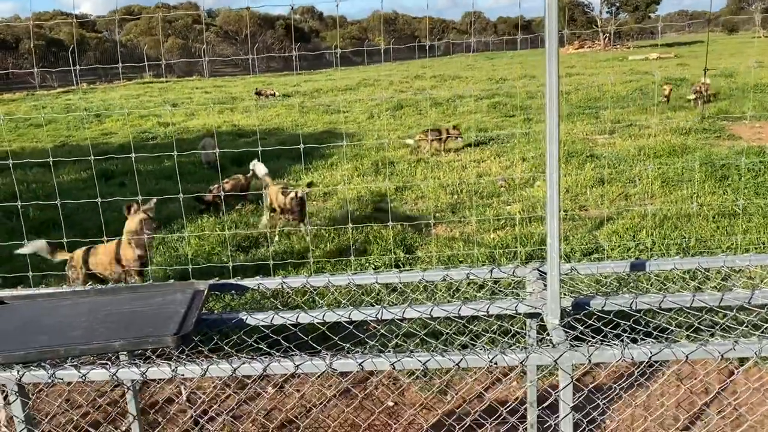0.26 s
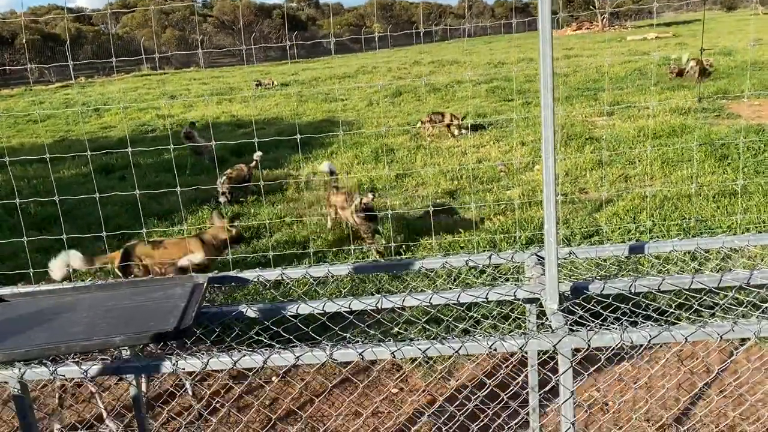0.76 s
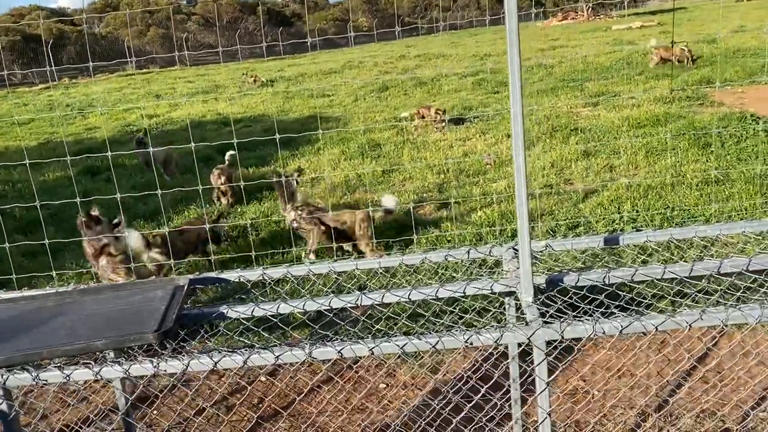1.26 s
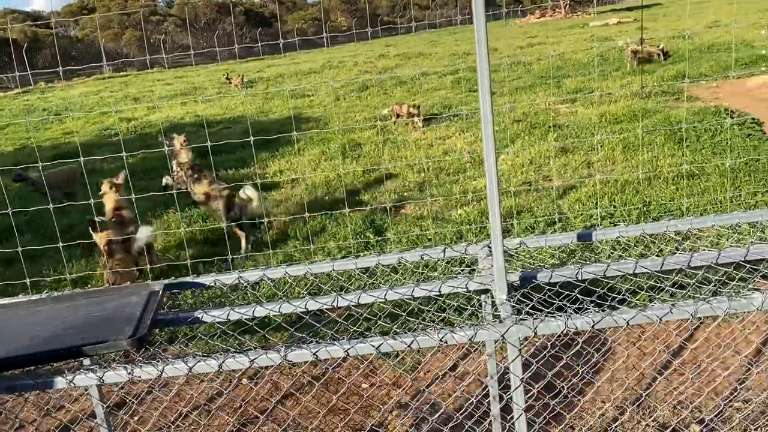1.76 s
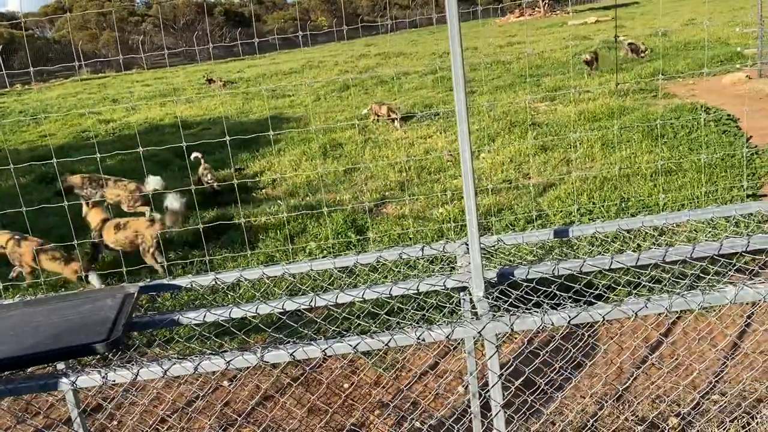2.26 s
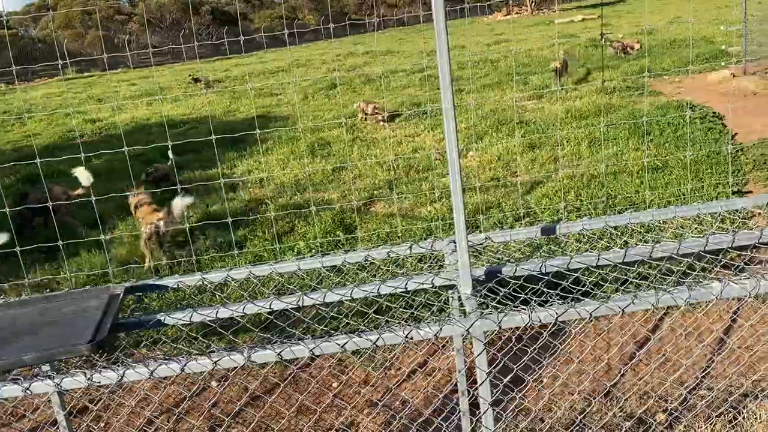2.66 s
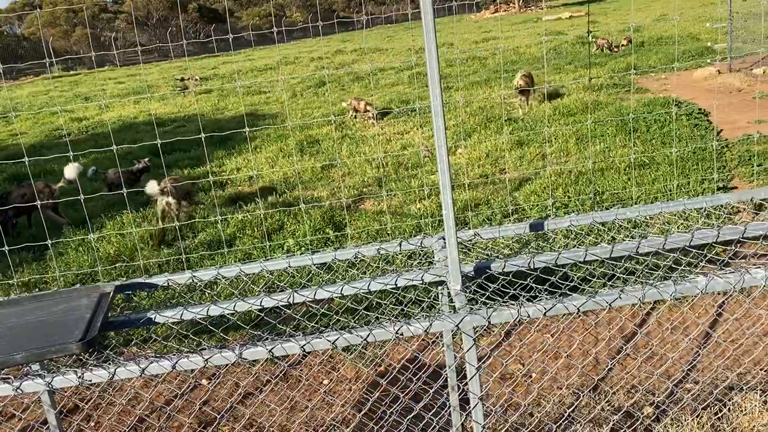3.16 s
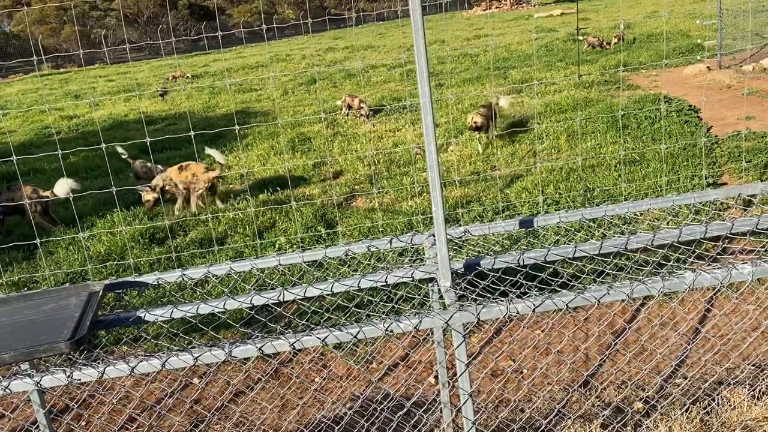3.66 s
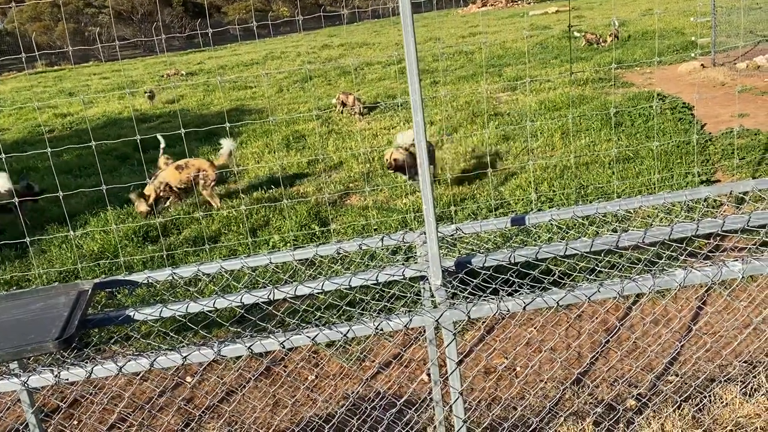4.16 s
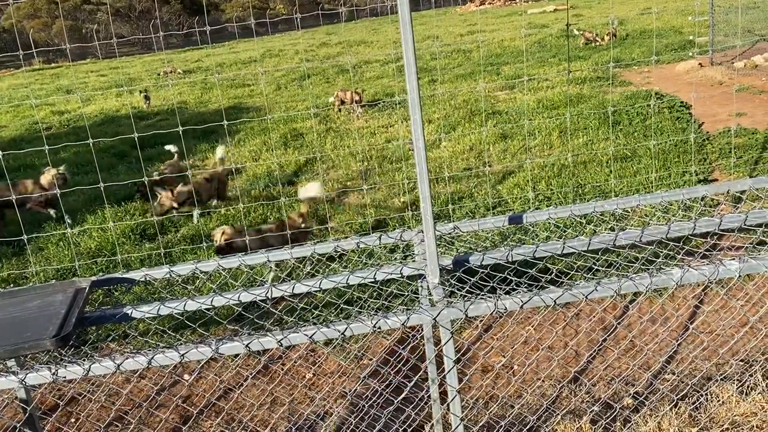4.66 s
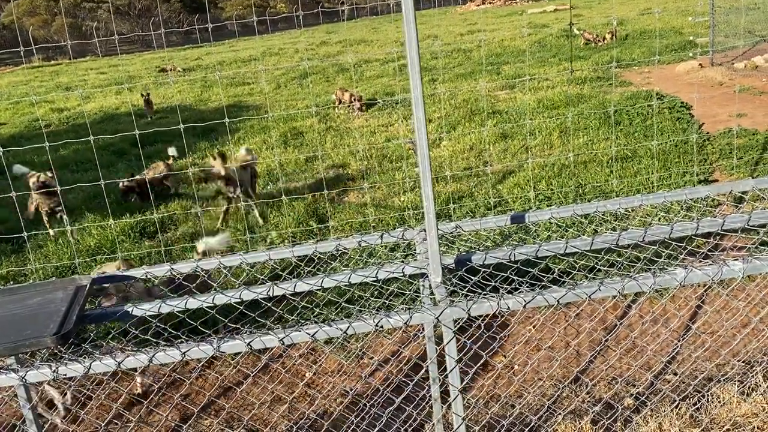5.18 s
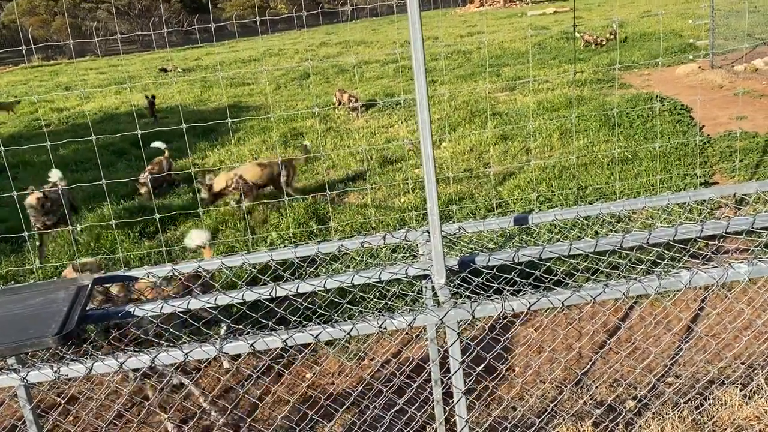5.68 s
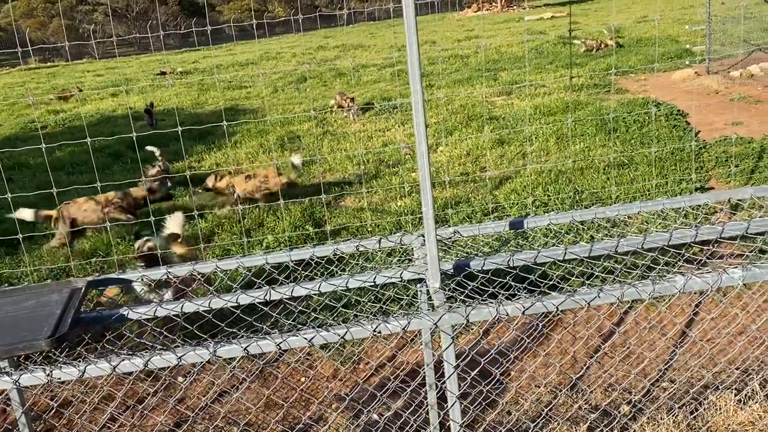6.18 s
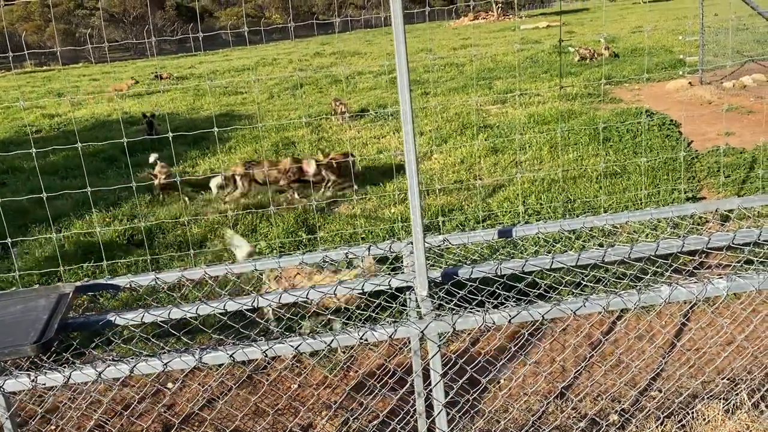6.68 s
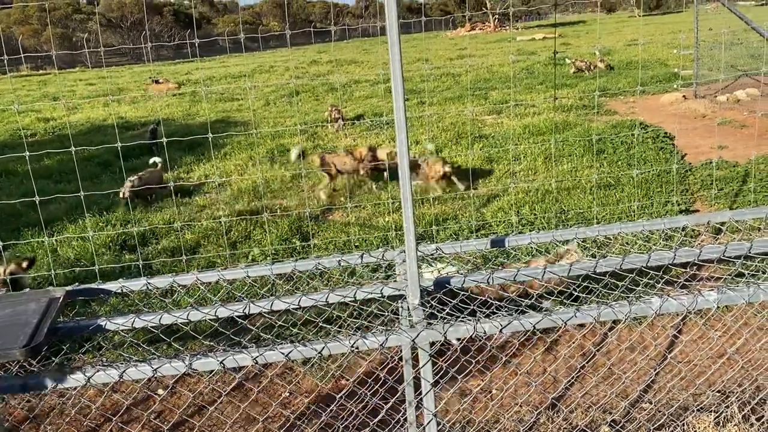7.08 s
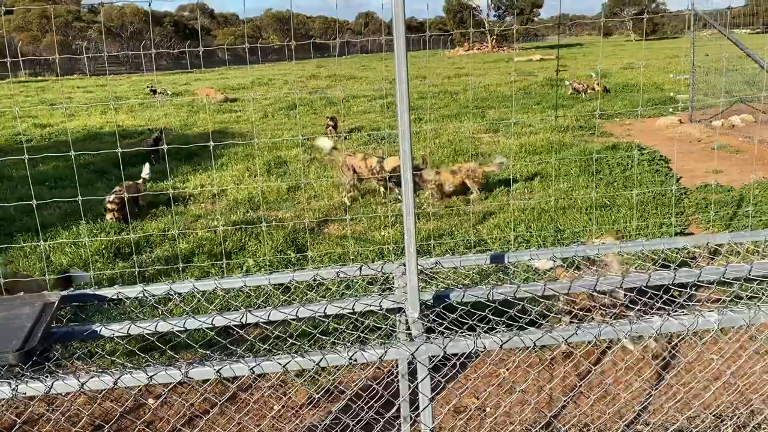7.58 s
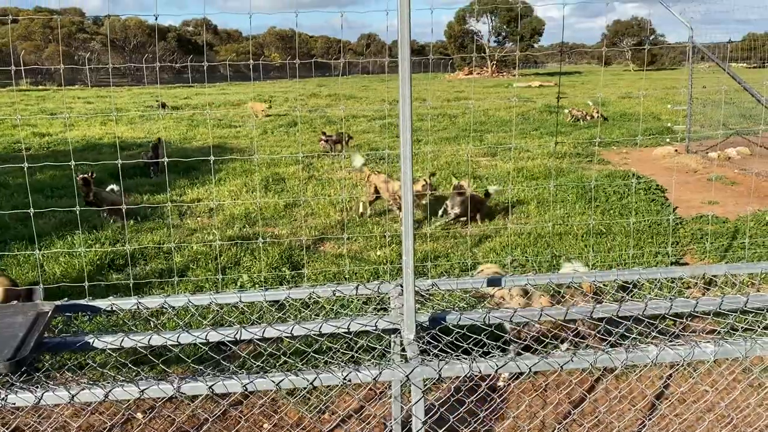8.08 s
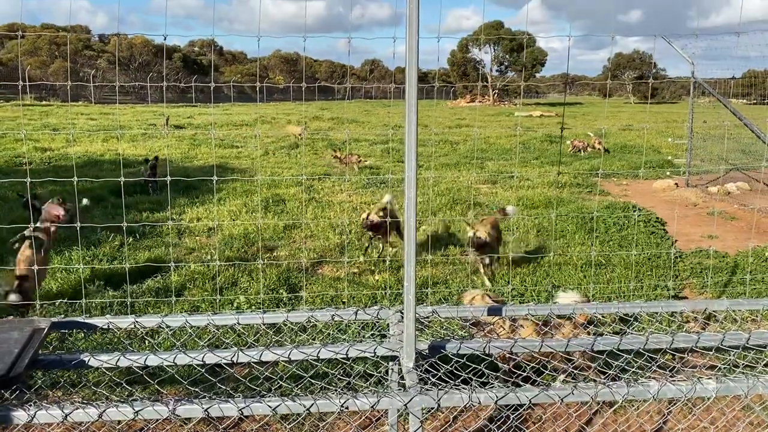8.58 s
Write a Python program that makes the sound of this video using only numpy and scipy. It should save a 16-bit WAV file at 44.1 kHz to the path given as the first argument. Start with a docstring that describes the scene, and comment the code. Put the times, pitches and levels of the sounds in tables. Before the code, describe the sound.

Wild dogs sound almost like birds: tiny harmonic chirps that rise, arch or drop, laced with airy piercing whistles. They come in bunches with gaps between, joined by a bright squeal, a sharp yelp, low grunts, faint rasps and a wavering whine. The open field adds slight scatter and a bright fence reflection. A stereo phone microphone catches low wind buffets, a few dull knocks and faint far-off rumble.

```python
"""Wild dog pack at the fence

African wild dogs twitter as they run about a grassy enclosure, heard from a phone at the fence.
Most calls are short gliding chirps of harmonics; thin pure whistles swoop among them in puffs of air.
A few calls stretch into whines, squeals and a yelp; grunts, toneless rasps and faint far answers join in.
Filtered noise makes the scatter off grass and fence, the fence knocks, the distant wash and the wind;
single eddies thump the microphone as slowing low tones."""
import sys
import numpy as np
from scipy import signal
from scipy.fft import rfft, irfft, next_fast_len
from scipy.io import wavfile
from scipy.ndimage import uniform_filter1d, map_coordinates

SR = 44100
rng = np.random.default_rng(int(sys.argv[2]) if len(sys.argv) > 2 else 0)


def unload_audio(sound):
    """Save the sound as a 16-bit wav file, at the path given as the first command line argument."""
    columns = np.transpose(np.atleast_2d(sound))
    # keep every value between -1 and 1, then stretch to whole-number steps
    steps = np.round(np.clip(columns, -1, 1) * 32767)
    wavfile.write(sys.argv[1], SR, steps.astype(np.int16))


N = 389844
TIME = np.arange(N) / SR

# Call levels are at the source, before its fades and the path to the phone.
# Harmonic levels are relative to the fundamental; upper_db is the 4th harmonic.
# Chirps of the pack: start_s, length_s, middle_pitch_hz, gesture, level_db, second_db, upper_db
CHIRP_CALLS = [(0, 0.021, 800, "sag", -30, -10, -22), (0.025, 0.062, 2000, "arch", -47.5, -17, -37),
               (0.101, 0.023, 2110, "level", -45, -17, -33), (0.135, 0.046, 1400, "hook", -47, -2.5, -24),
               (0.322, 0.028, 1810, "drop", -46.5, -23, -45), (0.4, 0.015, 1964, "drop", -54.5, -18, -30),
               (0.444, 0.04, 950, "climb", -49, -10, -16), (0.453, 0.06, 1880, "bow", -49.5, -8, -34),
               (0.544, 0.06, 1507, "bow", -52.5, 8, -33), (0.686, 0.015, 1675, "drop", -51, -7.5, -38),
               (1.293, 0.02, 1696, "level", -19, -22.5, -28),
               (1.314, 0.027, 1084, "drop", -30.5, -3.5, -15), (1.404, 0.04, 1155, "arch", -29.5, -5, -20),
               (1.448, 0.029, 725, "sag", -37.5, -11, -19), (1.499, 0.043, 1217, "rise", -41, -12, -19),
               (1.544, 0.04, 750, "sag", -48.5, -6, -15), (1.587, 0.043, 1640, "bow", -40.5, -1, -25),
               (1.747, 0.043, 1844, "arch", -27, -5.5, -19), (1.78, 0.02, 1336, "sag", -32.5, -24, -20),
               (1.829, 0.037, 1674, "rise", -44, -7, -8), (1.867, 0.051, 1352, "drop", -37.5, -10, -20.5),
               (1.955, 0.024, 1680, "hook", -49, 3, -15), (1.979, 0.028, 1550, "drop", -32, -8.5, -15.5),
               (2.029, 0.089, 1002, "arch", -50.5, -6, -4.5),
               (2.126, 0.04, 1848, "hook", -25, -12.5, -21.5), (2.151, 0.036, 898, "drop", -43, -15, -23),
               (2.32, 0.049, 1520, "drop", -37, -11, -22.5),
               (2.461, 0.064, 1720, "arch", -41.5, -0.5, -15.5),
               (2.831, 0.035, 997, "sag", -39.5, -13.5, -48), (3.157, 0.028, 1493, "drop", -37.5, 2.5, -20),
               (3.177, 0.036, 1870, "rise", -34.5, -12, -5.5),
               (3.201, 0.018, 1595, "sag", -27.5, -11, -25.5), (3.267, 0.034, 2020, "level", -36, -2, -10),
               (3.292, 0.021, 1397, "sag", -40.5, -13.5, -21), (3.344, 0.04, 2160, "rise", -37, 6.5, -8),
               (3.372, 0.02, 1622, "drop", -39.5, -19.5, -16), (3.397, 0.027, 1764, "hook", -45.5, 12, -6),
               (3.423, 0.018, 886, "sag", -39, -14, -20), (3.622, 0.04, 1560, "drop", -49.5, 9.5, -0.5),
               (3.666, 0.0084, 1010, "rise", -37.5, 12, -3.5), (3.952, 0.032, 1734, "sag", -44, -8.5, -18),
               (4, 0.029, 952, "sag", -40.5, -21, -19.5), (4.339, 0.036, 1924, "arch", -45, -0.5, -0.5),
               (4.372, 0.02, 1240, "drop", -45, -20, -24), (4.453, 0.0087, 1197, "climb", -36.5, -21, -29),
               (4.456, 0.032, 1567, "rise", -37, 2.5, -17.5), (4.667, 0.035, 1804, "hook", -36.5, -8, -10),
               (5.411, 0.015, 1363, "rise", -50.5, -11, -20), (5.74, 0.068, 2110, "climb", -50, -11, -9),
               (5.843, 0.044, 2000, "climb", -48, -13, -1), (5.945, 0.034, 1967, "climb", -48.5, -24, -7.5),
               (6.025, 0.032, 1747, "level", -28, -14, -13), (6.055, 0.011, 1437, "sag", -46, -6, -23),
               (6.118, 0.042, 2122, "bow", -29.5, -14, -7.5), (6.151, 0.017, 1508, "sag", -40, -13, -18),
               (6.208, 0.029, 1004, "sag", -54, -5, -23), (6.311, 0.022, 2212, "level", -34.5, -1, -11.5),
               (6.326, 0.028, 1504, "drop", -37.5, -20, -14.5), (6.491, 0.04, 1850, "slide", -39, -5, -10),
               (7.09, 0.03, 1037, "sag", -35.5, -4.5, -17.5), (7.206, 0.04, 925, "drop", -46.5, -11, -27),
               (7.578, 0.048, 1314, "rise", -27, -3.5, -15.5),
               (7.805, 0.052, 1325, "dive", -26.5, -12.5, -25), (7.871, 0.021, 1271, "sag", -29, -4.5, -20),
               (7.945, 0.031, 742, "sag", -36.5, -16, -13.5), (7.981, 0.025, 1057, "sag", -37.5, -9, -28),
               (8.167, 0.028, 1837, "hook", -34.5, -9, -18), (8.182, 0.034, 1080, "drop", -28, -10, -19.5),
               (8.279, 0.027, 869, "drop", -36, -3.5, -8), (8.657, 0.033, 1720, "drop", -29, -10, -24)]
# Pitch gestures of a chirp: start and end pitch, as ratios to the middle pitch ("rise" peaks midway and ends
# below its start)
CHIRP_GESTURES = {"arch": (.76, .68), "hook": (.93, .57), "drop": (1.3, 0.548), "rise": (.83, 0.77),
                  "sag": (1.1, 0.876), "dive": (.92, 0.361), "bow": (.81, .76), "slide": (1.03, 0.29),
                  "level": (.91, .92), "climb": (.86, 1.03)}
CHIRP_WAVER, CHIRP_FLUTTER_DB = 0.012, 3.5  # unsteadiness of pitch (share) and of level
CHIRP_CREST, CHIRP_WIDTH = 0.47, 0.49  # loudest point and width of the swell, as shares of the length
CHIRP_DB, WHISTLE_DB = -0.6, -1  # mix gain of the chirps and of the whistles with the trill
OVERTONE_FALL_DB = -4  # extra loss per harmonic above the fourth

# Whistles: middle_s, length_s, middle_pitch_hz, gesture, level_db (at the middle)
WHISTLE_CALLS = [(1.283, 0.011, 6780, "up", -25.5), (1.409, 0.016, 6550, "up", -20.5),
                 (1.52, 0.037, 9500, "sway", -36), (1.565, 0.0099, 11500, "hold", -28.5),
                 (1.634, 0.017, 6550, "down", -26), (1.647, 0.024, 5270, "dip", -28),
                 (1.735, 0.007, 6350, "hold", -21.5), (1.797, 0.011, 7650, "down", -30.5),
                 (1.816, 0.064, 5070, "sway", -35), (1.853, 0.026, 5900, "up", -38),
                 (1.903, 0.021, 9800, "up", -39), (1.947, 0.036, 6400, "dip", -37.5),
                 (1.993, 0.049, 6740, "sway", -31.5), (2.018, 0.023, 6600, "dip", -33),
                 (2.065, 0.084, 10660, "crest", -38), (2.12, 0.026, 8330, "up", -28),
                 (2.183, 0.022, 5000, "hold", -25.5), (2.315, 0.022, 7970, "up", -33.5),
                 (2.514, 0.011, 9040, "down", -32.5), (2.529, 0.033, 5130, "dip", -29.5),
                 (2.835, 0.064, 6180, "hold", -42.5), (3.151, 0.0131, 7430, "up", -31.5),
                 (3.209, 0.016, 10900, "up", -36), (3.301, 0.0126, 12000, "down", -43),
                 (3.308, 0.02, 7200, "down", -37), (3.381, 0.0067, 6870, "dip", -26),
                 (3.402, 0.0075, 9200, "up", -29), (3.439, 0.019, 4730, "dip", -33),
                 (3.455, 0.035, 6950, "up", -37), (3.62, 0.033, 7040, "up", -29.5),
                 (3.626, 0.013, 12600, "up", -43), (3.672, 0.0096, 11900, "down", -30),
                 (3.992, 0.0073, 8000, "down", -30.5), (4, 0.027, 4750, "dip", -34.5),
                 (4.02, 0.064, 7020, "hold", -44), (4.334, 0.011, 11500, "up", -39.5),
                 (4.371, 0.017, 11800, "down", -36.5), (4.389, 0.028, 7540, "down", -36.5),
                 (4.454, 0.09, 9800, "dip", -46), (4.656, 0.013, 10100, "up", -46),
                 (4.712, 0.02, 11100, "up", -41.5), (4.948, 0.03, 7900, "hold", -38),
                 (4.953, 0.0116, 11300, "up", -32.5), (5.173, 0.018, 7280, "up", -37.5),
                 (5.498, 0.072, 6160, "hold", -49.5), (5.604, 0.023, 12400, "hold", -45),
                 (5.837, 0.013, 9340, "up", -39.5), (5.895, 0.027, 10400, "down", -40.5),
                 (5.99, 0.05, 10300, "down", -44.5), (6.057, 0.015, 12600, "down", -38.5),
                 (6.102, 0.022, 11500, "hold", -37), (6.152, 0.014, 12200, "down", -32.5),
                 (6.449, 0.027, 14800, "hold", -37), (6.532, 0.018, 14500, "down", -30.5),
                 (6.799, 0.065, 14900, "sway", -38.5), (6.99, 0.048, 13000, "sway", -39),
                 (7.048, 0.031, 12630, "sway", -33.5), (7.086, 0.026, 7400, "hold", -37.5),
                 (7.105, 0.04, 8800, "hold", -29), (7.131, 0.019, 6470, "dip", -28.5),
                 (7.525, 0.11, 8030, "hold", -39.5), (7.563, 0.026, 7970, "hold", -33),
                 (7.579, 0.028, 9050, "up", -25.5), (7.601, 0.04, 11350, "hold", -37),
                 (7.628, 0.033, 8050, "down", -36.5), (7.801, 0.013, 10100, "up", -29.5),
                 (7.859, 0.036, 6450, "dip", -31), (7.866, 0.02, 11000, "up", -36),
                 (7.898, 0.021, 10730, "hold", -37), (7.9, 0.027, 5167, "hold", -17),
                 (7.921, 0.0057, 8050, "up", -21.5), (7.985, 0.034, 7760, "sway", -26.5),
                 (8.149, 0.008, 7360, "up", -36), (8.156, 0.0099, 7460, "dip", -33),
                 (8.189, 0.03, 9900, "crest", -46), (8.21, 0.051, 8400, "sway", -31.5),
                 (8.228, 0.012, 6100, "dip", -30.5), (8.25, 0.026, 8780, "hold", -25),
                 (8.274, .024, 6500, "dip", -24.5), (8.368, .11, 10790, "level", -44),
                 (8.44, .06, 9550, "dip", -42.5)]
# Pitch gestures of a whistle: start and end pitch, as ratios to the middle pitch
WHISTLE_GESTURES = {"up": (.88, 1.51), "down": (1.7, .79), "dip": (1.3, 1.5), "hold": (0.92, 0.96),
                    "sway": (0.88, 1.1), "crest": (0.5, 0.79), "level": (0.78, .93)}
# One whistle that runs on between two chirps: time_s, pitch_hz, level_db
TRILL_CONTOUR = [(1.426, 7500, -41), (1.442, 4800, -29.5), (1.46, 4950, -32.5), (1.47, 6150, -43),
                 (1.485, 6400, -39), (1.502, 6000, -25.5), (1.528, 6950, -40), (1.543, 5300, -34),
                 (1.556, 5150, -30), (1.565, 5950, -26.5), (1.574, 5000, -46), (1.591, 4800, -32.5),
                 (1.6, 7300, -34), (1.606, 8600, -44)]
WARBLE, WARBLE_RATE = 0.022, 200  # kinks in a whistle's pitch: share, and kinks per second
WHISTLE_EDGE_DB = -19  # both ends against the middle
HISS_DB, HISS_SPREAD_S = -18, 0.0078  # air puff: level against its whistle, and how far it outlasts it
SPRAY_DB, SPRAY_S = -6, 0.014  # treble that grass and mesh scatter from a whistle: level, decay

# Loud hoarse yelp: time_s, pitch_hz, level_db, second_db, upper_db, roughness (0-1)
YELP_CONTOUR = [(4.945, 1340, -33, -12, -21, .5), (4.955, 1495, -22, -20, -27, 0.33),
                (4.964, 1978, -18, -14, -21.5, 0.05), (4.972, 2099, -16, -8, -24, 0),
                (4.986, 1827, -22, -7, -13, 0.17), (4.994, 1364, -17, -22, -16, 0.12),
                (5.002, 978, -23.5, -28, -30.5, 0.54), (5.007, 580, -29.5, -8, -22.5, 0.7),
                (5.022, 427, -33, -5, -19, 0.6)]
# Nasal whine that rocks down and up: time_s, pitch_hz, level_db, second_db, upper_db, roughness (0-1)
NASAL_CONTOUR = [(8.556, 1730, -58, 6, 3, .1), (8.572, 1700, -50, 9, 6, .1), (8.597, 1280, -54, 9, 9, .1),
                 (8.63, 1280, -52, 7, 10, .1), (8.655, 1530, -49, 11, 11, .1), (8.69, 1260, -56, 5, 8, .15),
                 (8.73, 1250, -62, 3, 8, .15)]
# Drawn-out calls within the pack: time_s, pitch_hz, level_db, second_db
WHIMPER_CONTOUR = [(6.275, 1197, -43.5, -26), (6.305, 1293, -42.5, -27), (6.335, 889, -47.5, -20),
                   (6.368, 928, -36.5, -21), (6.398, 1360, -39, -32), (6.425, 964, -40, -21.5),
                   (6.455, 1346, -54.5, -15), (6.485, 1646, -37, -22), (6.515, 1166, -49.5, -19),
                   (6.55, 1394, -51.5, 1), (6.585, 1664, -39.5, -14.5), (6.615, 1465, -50, -4.5),
                   (6.655, 1614, -59, -4), (6.68, 1464, -47.5, -18), (6.73, 1725, -32.5, -37)]
MEW_CONTOUR = [(8.28, 1050, -36, -10), (8.297, 1310, -40, 0), (8.32, 1350, -45, 9), (8.36, 1596, -36, -3),
               (8.39, 1740, -32.5, -24), (8.42, 1690, -34.5, -7), (8.452, 1190, -41.5, 4)]
# Drawn-out calls of two dogs apart from the pack: time_s, pitch_hz, level_db, second_db
SQUEAL_CONTOUR = [(3.672, 1950, -47, -8), (3.676, 1824, -22.5, 2), (3.696, 2257, -15.5, -8.5),
                  (3.726, 1883, -17, -7.5), (3.74, 1843, -29, -23), (3.752, 2370, -28.5, -29.5),
                  (3.768, 2540, -24.5, -19), (3.79, 2533, -14.5, -20), (3.816, 2385, -28, -26.5),
                  (3.834, 2570, -33, -9.5), (3.853, 2590, -20.5, -28.5), (3.885, 2600, -35, -22),
                  (3.95, 2650, -50, -23)]
WHINE_CONTOUR = [(6.732, 1910, -37, -32), (6.746, 1962, -21.5, -13), (6.766, 2065, -12.5, -34),
                 (6.804, 1776, -29, -3.5), (6.844, 2000, -24, -17), (6.882, 1926, -50, -7),
                 (6.93, 1975, -19.5, -31), (6.952, 2003, -40.5, -14.5), (6.972, 1757, -43.5, -5),
                 (6.988, 1630, -55, 0.5)]
SQUEAL_LEAD_S, WHINE_LEAD_S = .00003, -0.00025  # extra lead of the left port for these two dogs
# Low hoarse grunts: start_s, length_s, middle_pitch_hz, level_db, second_db, upper_db
GRUNT_CALLS = [(5.424, 0.0214, 544, -33.5, -28, -26), (5.444, 0.022, 475, -39, -11, -21),
               (7.378, 0.015, 716, -41.5, -9, -21), (7.391, 0.0292, 641.5, -35.5, -10, -11.5)]
# Toneless rasps around the calls, the first a narrow band ringing back after the yelp: start_s, length_s,
# centre_hz, level_db
RASP_CALLS = [(5.023, 0.15, 1160, -46.5), (5.42, 0.045, 900, -53), (5.479, 0.098, 990, -53.5),
              (6.511, 0.043, 1200, -35), (7.367, 0.13, 2500, -53), (7.419, 0.11, 1350, -47),
              (7.51, 0.076, 1220, -52.5)]

# Knocks and scuffs at the fence: start_s, level_db, body_hz, decay_s, rattle_db (against the body)
FENCE_KNOCKS = [(2.358, -20, 227, 0.0038, -15), (3.006, -25, 288, 0.017, -23.5),
                (4.233, -47, 500, 0.0025, -10), (8.464, -25, 1130, 0.007, 0.5),
                (8.473, -47, 1110, 0.0065, 11), (8.487, -35, 1500, 0.0074, 6),
                (8.763, -25, 305, 0.0058, -17.5)]
# Level of the clear bright reflection off the fence: time_s, level_db
FENCE_ECHO_LEVEL = [(1.4, -17), (2.2, -15.5), (3.3, -8.5), (4.5, -8.5), (4.97, -20), (6.1, -11.5),
                    (6.7, -10), (7.6, -20), (8.6, -18)]
FENCE_ECHO_S, FENCE_ECHO_HZ = .023, 2430  # delay, and the pitch below which sound slips through the mesh
SCATTER_DB, SCATTER_S = -10.5, 0.0085  # grass and fence nearby: level, decay
TAIL_DB, TAIL_T60_S = -17, 0.37  # the open field: level, time to fall 60 dB
ROAM_RATE = 2.5  # how often per second the running dogs change their path to the fence
FAR_ECHO_DB, FAR_ECHO_S, FAR_SPREAD_S = -37.5, 0.0924, 0.014  # far side: level, delay, smear

# Spectrum of the distant wash, relative: frequency_hz, level_db
DISTANT_COLOUR = [(40, -27.5), (100, 0.5), (160, 0.5), (200, 12), (245, -1), (300, 3.5), (600, -7),
                  (1200, -15.5), (3000, -25), (7000, -26.5), (11000, -23.5), (13500, -24.5), (15500, -29.5)]
DISTANCE_DB = -47.5  # level of the part common to both ports
# Spectrum of the wind, relative: frequency_hz, level_db
WIND_SPECTRUM = [(20, -32), (45, -2), (70, 4), (120, -4), (200, -15.5), (400, -29.5), (1000, -98)]
# Gusts on the microphone: centre_s, level_db, half_width_s (to 1/e of the power)
WIND_GUSTS = [(.04, -30, 0.053), (.36, -36, 0.071), (.84, -39, 0.09), (1.46, -33, 0.16),
              (1.64, -28.5, 0.093), (1.85, -39, 0.13), (2.45, -35, 0.053), (4.2, -47.5, 0.083),
              (6.961, -41.5, 0.085), (7.918, -34.5, 0.14), (8.4, -40, 0.13), (8.82, -35.5, 0.057)]
# Eddies that hit the microphone: start_s, peak_db, starting_hz, length_s (peak after a quarter of it)
EDDIES = [(0.223, -30.5, 202, 0.015), (0.321, -26.5, 111, 0.027), (0.415, -30, 130, 0.017),
          (.555, -29, 91, 0.036), (0.706, -19.5, 150, 0.034), (1.422, -17.5, 135, 0.035),
          (1.533, -12, 262, 0.01), (1.673, -9, 355, 0.04), (2.31, -25.5, 222, 0.023),
          (2.44, -19, 244, 0.012), (2.673, -23, 209, 0.015), (4.087, -30, 140, 0.021),
          (4.306, -27, 100, 0.019), (6.963, -31.5, 70, 0.038), (7.58, -25, 80, 0.039),
          (7.998, -22.5, 169.5, 0.022), (8.283, -30, 80, 0.03), (8.402, -27, 108, 0.036),
          (8.782, -18, 78.5, 0.032)]
WIND_DB = -49.5  # steady wind, part common to both ports
GUST_DB, GUST_RATE = 3.6, 19  # quick swings of the wind: spread, and swings per second
BUFFET_LEAD = -0.27  # an eddy reaches the ports at different moments: radians either way

# How the two ports differ: frequency_hz, left_minus_right_db, left_lead_rad
PORT_DIFFERENCE = [(100, -1.5, -0.5), (494, 0.5, 0.72), (900, 3, 1.06), (1457, -4, 1.89), (1780, -7.5, 4),
                   (2295, 1, 4.5), (2730, 1.5, 8), (3370, 10, 8.5), (3940, 3, 13.5), (5270, 4, 13.5),
                   (6200, 3.5, 14), (7250, 0, 14)]
# Phase in the top octave, where both ports are equally strong: frequency_hz, left_lead_rad
PORT_TREBLE_LEAD = [(8100, 9.4), (9000, 8.6), (10300, 6.3), (11500, 6.1), (12700, 3.2), (13800, 2.9),
                    (15700, -.1)]
TOP_HZ = 15900  # upper limit of the phone


def undb(db):
    """Decibels to gain."""
    return 10 ** (np.asarray(db) / 20)


def add(track, start, sound):
    """Mix a sound into a track at a time in seconds."""
    i = max(int(start * SR), 0)
    part = track[..., i:i + sound.shape[-1]]
    part += sound[..., :part.shape[-1]]


def wobble(n, rate):
    """Smooth random motion with a spread near 1, through `rate` random points per second."""
    x = np.arange(n) / SR * rate
    points = rng.standard_normal(int(x[-1]) + 4)
    return map_coordinates(points, [x + 1], order=2, mode="nearest")


def noise(colour, n):
    """Noise of rms 1 with a spectrum of (Hz, dB) points."""
    hz, db = np.transpose(colour)
    size = next_fast_len(n)
    f = np.maximum(np.fft.rfftfreq(size, 1 / SR), 1)
    gain = undb(np.interp(np.log(f), np.log(hz), db))
    x = irfft(rfft(rng.standard_normal(size)) * gain, size)[:n]
    return x / x.std()


def fade(t, rise, fall):
    """Rounded start and end of a call, in seconds."""
    nearest_end = np.minimum(t / rise, (t[-1] - t) / fall)
    return np.sin(np.pi / 2 * np.clip(nearest_end, 0, 1)) ** 2


def turns(hz):
    """Phase in radians of a tone that follows a pitch curve."""
    return 2 * np.pi * np.cumsum(hz) / SR


def glide(u, hz, ends):
    """Pitch along a parabola through the start, middle and end of a call (u from 0 to 1)."""
    return hz * np.polyval(np.polyfit([0, .5, 1], [ends[0], 1, ends[1]], 2), u)


def contour(rows):
    """Time axis and softly rounded columns of one call."""
    s, *columns = np.transpose(rows)
    t = np.arange(int(max(s[-1] - s[0], .01) * SR)) / SR
    curves = (np.interp(t + s[0], s, c) for c in columns)
    return t, *(uniform_filter1d(c, size=131, mode="nearest") for c in curves)


def voice(hz, second_db, upper_db, jitter, rasp, slope_db, breath_db):
    """Harmonics of a slightly unsteady pitch; rasp shakes their level, and air hisses once a cycle."""
    n = len(hz)
    phase = turns(hz * (1 + jitter * wobble(n, 515.6)))
    levels = [0, second_db]
    for k in range(3, 9):
        levels.append(upper_db + slope_db * (k - 4) + OVERTONE_FALL_DB * max(k - 4, 0))
    throat_hz = 7400  # the throat passes little above this
    tone = sum(undb(db) * np.sin(k * phase) / (1 + (k * hz / throat_hz) ** 6)
               for k, db in enumerate(levels, 1))
    breath = noise([(400, -15), (1300, 0), (4500, -4), (7000, -9), (15000, -21)], n)
    air = breath * (1 + np.cos(phase))
    return np.sqrt(2) * tone * (1 + rasp * wobble(n, 1497.5)) + air * undb(upper_db + breath_db)


def chirps():
    """Pitch arches and drops; the voice turns hoarse as it falls away or when it is low."""
    out = np.zeros(N)
    edge = 0.0045  # s, lead-in and run-out
    for start, length, middle_hz, shape, db, second_db, upper_db in CHIRP_CALLS:
        t = np.arange(int((length + 2 * edge) * SR)) / SR
        u = (t - edge) / length
        hz = np.maximum(glide(u, middle_hz, CHIRP_GESTURES[shape]), 250)
        swell = np.exp(-((u - CHIRP_CREST) / CHIRP_WIDTH) ** 2) * fade(t, 0.0055, 0.0045)
        swell = swell * undb(CHIRP_FLUTTER_DB * wobble(len(t), 157.7))
        swell = swell / np.sqrt(np.mean(swell ** 2))
        slack = 1 - hz / max(hz.max(), 1300)
        hz = hz * (1 + CHIRP_WAVER * wobble(len(t), 107.4))
        call = voice(hz, second_db, upper_db, jitter=.007 + .026 * slack, rasp=.07 + .35 * slack,
                     slope_db=-2.6, breath_db=-13)
        add(out, start - edge, call * swell * undb(db))
    return out


def whistles():
    """The second voice: a nearly pure tone that glides within milliseconds, loudest midway, in a puff of air."""
    out, puffs = np.zeros(N), np.zeros(N)
    for middle, length, middle_hz, shape, db in WHISTLE_CALLS:
        t = np.arange(int(length * SR)) / SR
        u = t / length
        hz = glide(u, middle_hz, WHISTLE_GESTURES[shape])
        phase = turns(hz * (1 + 0.0033 * wobble(len(t), 710) + WARBLE * wobble(len(t), WARBLE_RATE)))
        tone = np.sin(phase) + undb(-20.5) * np.sin(2 * phase) * (2 * hz < SR / 2)
        flutter_db = 2.5 * wobble(len(t), 200)
        level = undb(db + WHISTLE_EDGE_DB * abs(2 * u - 1) + flutter_db)
        add(out, middle - length / 2, np.sqrt(2) * tone * level * fade(t, 0.00091, 0.0011))
        reach = length / 2 + 2 * HISS_SPREAD_S
        add(puffs, middle - reach, undb(db + HISS_DB) * np.hanning(int(2 * reach * SR)) ** 2)
    return out + puffs * noise([(2500, -2.0), (6000, -4.0), (10000, 1.5), (15500, -13.5)], N)


def trill():
    """The whistling voice held on, its pitch swinging up and down."""
    out = np.zeros(N)
    t, hz, db = contour(TRILL_CONTOUR)
    tone = np.sqrt(2) * np.sin(turns(hz * (1 + 0.013 * wobble(len(t), 600))))
    level = undb(db + 2.4 * wobble(len(t), 202))
    add(out, TRILL_CONTOUR[0][0], tone * level * fade(t, .003, .003))
    return out


def spray(x):
    """A sound with its treble scattered by grass and mesh into a brief bright haze."""
    t = np.arange(SR // 8) / SR
    haze = noise([(3000, -13.0), (7000, -7.5), (11000, 3.0), (15000, 4.5)], len(t)) * np.exp(-t / SPRAY_S)
    return x + undb(SPRAY_DB) * signal.fftconvolve(x, haze / np.linalg.norm(haze))[:N]


def cry(rows):
    """A call rich in harmonics whose hoarseness changes as it goes."""
    out = np.zeros(N)
    t, hz, db, second_db, upper_db, rough = contour(rows)
    call = voice(hz, second_db, upper_db, jitter=.09 * rough, rasp=rough, slope_db=-3, breath_db=-8)
    add(out, rows[0][0], call * undb(db) * fade(t, .003, .004))
    return out


def whine(rows):
    """A long call whose pitch rocks up and down, clear when high and hoarser when low."""
    out = np.zeros(N)
    t, hz, db, second_db = contour(rows)
    hoarse = np.clip((1900 - hz) / 600, 0, 1)
    hz = hz * (1 + .009 * wobble(len(t), 110))
    call = voice(hz, second_db, second_db - 19, jitter=.006 + .012 * hoarse, rasp=.05 + .15 * hoarse,
                 slope_db=-7, breath_db=-6)
    flutter_db = 1.6 * wobble(len(t), 90)
    add(out, rows[0][0], call * fade(t, 0.004, 0.0042) * undb(db + flutter_db))
    return out


def grunts():
    """Low falling calls with very uneven cycles and much air."""
    out = np.zeros(N)
    for start, length, middle_hz, db, second_db, upper_db in GRUNT_CALLS:
        t = np.arange(int((length + 0.0075) * SR)) / SR
        hz = glide(t / t[-1], middle_hz, (1.12, .78))
        call = voice(hz, second_db, upper_db, jitter=0.1085, rasp=0.44, slope_db=-4.5, breath_db=-6.5)
        add(out, start - .004, undb(db) * call * fade(t, 0.011, 0.015))
    return out


def rasps():
    """Toneless, fluttering air in one narrow resonance; the first band rings back after the yelp."""
    out = np.zeros(N)
    for start, length, hz, db in RASP_CALLS:
        t = np.arange(int(length * SR)) / SR
        resonance = [(hz / 3, -24), (hz * .8, -10), (hz, 0), (hz * 1.25, -11), (hz * 4, -30), (hz * 12, -50)]
        air = noise(resonance, len(t))
        add(out, start, air * undb(db + 1.9 * wobble(len(t), 150)) * fade(t, .012, 0.062))
    return out


def answers(below_db, ceiling_db, lag_s):
    """Dogs further off: each chirp draws a fainter one at a random pitch, led by a quick rising whistle."""
    out = np.zeros(N)
    draws = rng.random((len(CHIRP_CALLS), 5))
    for row, (wait, pitch, span, size, top) in zip(CHIRP_CALLS, draws):
        start = row[0] + lag_s * wait
        db = min(row[4] + below_db, ceiling_db) - 7 * size
        t = np.arange(int((0.025 + 0.035 * span) * SR)) / SR
        hz = (1200 + 900 * pitch) * (1 - (t / t[-1] - .35) ** 2)
        call = voice(hz, 1.51, -16.0, jitter=0.013, rasp=0.18, slope_db=-8.0, breath_db=-20.0)
        add(out, start, undb(db) * call * fade(t, 0.033, 0.07))
        t = t[:int(.015 * SR)]
        sweep_hz = (5500 + 4000 * top) * (1 + 0.87 * (t / t[-1]) ** 2)
        add(out, start - t[-1], undb(db) * np.sin(turns(sweep_hz)) * fade(t, 0.0014, 0.0051))
    return out


def knocks():
    """Short blows on the fence: a damped body and a bright wire rattle."""
    out = np.zeros(N)
    t = np.arange(SR // 5) / SR
    for start, db, hz, decay, rattle_db in FENCE_KNOCKS:
        body = noise([(hz / 4, -26), (hz / 2, -12), (hz, 0), (hz * 2, -15), (hz * 8, -50)], len(t))
        rattle = noise([(300, -20), (1200, 0), (3500, -3), (8000, -8), (15000, -14)], len(t))
        blow = (body + undb(rattle_db) * rattle) * np.exp(-t / decay)
        add(out, start, undb(db) * blow * fade(t, 0.0017, .01))
    return out


def enclosure(x):
    """Soft scatter off grass and fence that changes as the dogs run, and a faint outdoor tail."""
    t = np.arange(int(.5 * SR)) / SR
    near_colour = [(200, -1.5), (1000, -3.0), (5000, 1.5), (9000, 1.5), (15000, -2)]
    far_colour = [(200, 3), (900, -4), (2000, -3), (3500, -3), (9000, 3.5), (15000, 0)]

    def through(shape, colour):
        response = shape / np.linalg.norm(shape) * noise(colour, len(t))
        return signal.fftconvolve(x, response)[:N]

    early = np.exp(-t / SCATTER_S) * (t > .002)
    late = undb(-60 * t / TAIL_T60_S) * (t > .015)
    # three scatter patterns trade places at constant power
    paths = np.array([wobble(N, ROAM_RATE) for _ in range(3)])
    shares = paths / np.linalg.norm(paths, axis=0)
    scatter = sum(share * through(early, near_colour) for share in shares)
    # a steady pattern of opposite sign in the two ports widens it
    scatter = scatter + 1.04 * through(early, near_colour) * np.array([[1], [-1]])
    shared, left, right = (through(late, far_colour) for _ in range(3))
    tail = shared + 0.64 * np.array([left, right])
    return x + undb(SCATTER_DB) * scatter + undb(TAIL_DB) * tail


def place(x, lead_s, pan_db):
    """A dog apart from the pack, whose direction shifts the lag between the ports."""
    left, right = enclosure(x) * undb(np.array([[pan_db], [-pan_db]]) / 2)
    return np.array([left, map_coordinates(right, [np.arange(N) - lead_s * SR], order=3)])


def fence_echo(x):
    """A single late copy of the treble off the fence, its level drifting."""
    bright = signal.sosfilt(signal.butter(1, FENCE_ECHO_HZ, "high", fs=SR, output="sos"), x)
    level_db = np.interp(TIME, *np.transpose(FENCE_ECHO_LEVEL))
    return np.interp(TIME - FENCE_ECHO_S, TIME, bright) * undb(level_db)


def far_echo(x):
    """The far side of the enclosure sends back a dull, smeared answer."""
    t = np.arange(SR // 4) / SR
    smear = np.exp(-((t - FAR_ECHO_S) / FAR_SPREAD_S) ** 2)
    colour = [(500, -0.5), (1200, -13.5), (2000, -12), (4000, -30.5), (9000, -51.0)]
    responses = [smear * noise(colour, len(t)) for _ in range(2)]
    echoes = [signal.fftconvolve(x, r / np.linalg.norm(r))[:N] for r in responses]
    return undb(FAR_ECHO_DB) * np.array(echoes)


def distance():
    """Far traffic and moving leaves: a wash that swells unevenly, most in the lows, diffuse in mid range."""
    mid, side = noise(DISTANT_COLOUR, N), noise(DISTANT_COLOUR, N)
    side = signal.sosfilt(signal.butter(1, 900, "high", fs=SR, output="sos"), side)
    side = signal.sosfilt(signal.butter(10, 7300, fs=SR, output="sos"), side)
    low = signal.sosfiltfilt(signal.butter(2, 700, fs=SR, output="sos"), mid)
    mid = mid - low + low * undb(1.55 * wobble(N, 17))
    return np.array([mid + 0.66 * side, mid - 0.96 * side]) * undb(DISTANCE_DB + 1.53 * wobble(N, 4.1))


def wind():
    """Low turbulence in gusts, and single eddies whose pressure swings slow down as they pass."""
    power = undb(WIND_DB + GUST_DB * wobble(N, GUST_RATE)) ** 2
    for centre, db, width in WIND_GUSTS:
        u = np.arange(-min(3, centre / width), 3, 1 / (width * SR))
        add(power, centre - 3 * width, undb(db) ** 2 * np.exp(-u ** 2))
    shared = noise(WIND_SPECTRUM, N)
    out = np.array([shared + 0.57 * noise(WIND_SPECTRUM, N) for _ in range(2)]) * np.sqrt(power)
    for start, peak_db, hz, length in EDDIES:
        t = np.arange(int(2 * length * SR)) / SR
        phase = turns(45 + (hz - 45) * np.exp(-t / 0.00787))  # settles towards 45 Hz
        swing = np.sin(phase + BUFFET_LEAD * np.array([[1], [-1]]))
        age = 4 * t / length
        add(out, start, -undb(peak_db) * swing * age * np.exp(1 - age))
    return out


def ports(x):
    """The phone's two ports differ in level and phase across the spectrum."""
    f = np.fft.rfftfreq(N, 1 / SR)
    hz, db, _ = np.transpose(PORT_DIFFERENCE)
    leads = [(row[0], row[2]) for row in PORT_DIFFERENCE] + PORT_TREBLE_LEAD
    lead = np.interp(f, *np.transpose(leads))
    left = undb(np.interp(f, hz, db) / 2) * np.exp(.5j * lead)
    return irfft(rfft(x) * np.array([left, 1 / left]), N)


def scene():
    """The pack twitters in the enclosure, two dogs call apart from it, and wind strikes the microphone."""
    pack = undb(CHIRP_DB) * chirps() + undb(WHISTLE_DB) * spray(whistles() + trill())
    pack = pack + cry(YELP_CONTOUR) + grunts() + rasps() + knocks()
    pack = pack + answers(below_db=-5.0, ceiling_db=-43.0, lag_s=.06)
    pack = pack + whine(WHIMPER_CONTOUR) + whine(MEW_CONTOUR) + cry(NASAL_CONTOUR)
    field = enclosure(pack) + fence_echo(pack) + far_echo(pack) + distance()
    field = field + place(whine(SQUEAL_CONTOUR), SQUEAL_LEAD_S, pan_db=-1.0)
    field = field + place(whine(WHINE_CONTOUR), WHINE_LEAD_S, pan_db=-1.0)
    return ports(field) + wind()


def record(dry):
    """The phone cuts the top with a steep low-pass."""
    return signal.sosfilt(signal.ellip(10, .2, 70, TOP_HZ, fs=SR, output="sos"), dry)


dry = scene()
out = record(dry)
unload_audio(out)
```